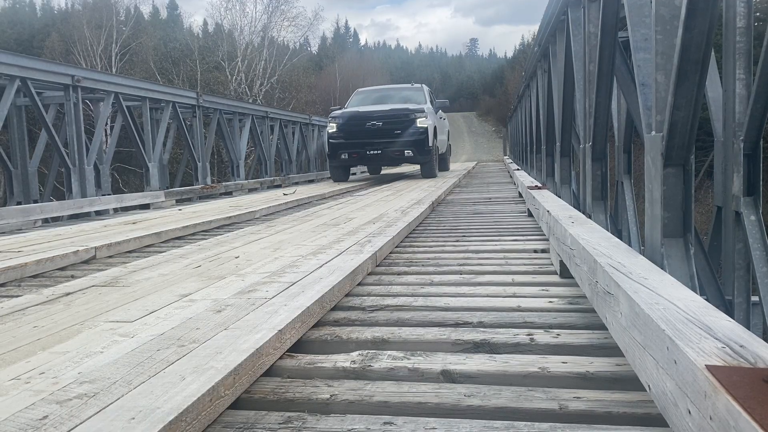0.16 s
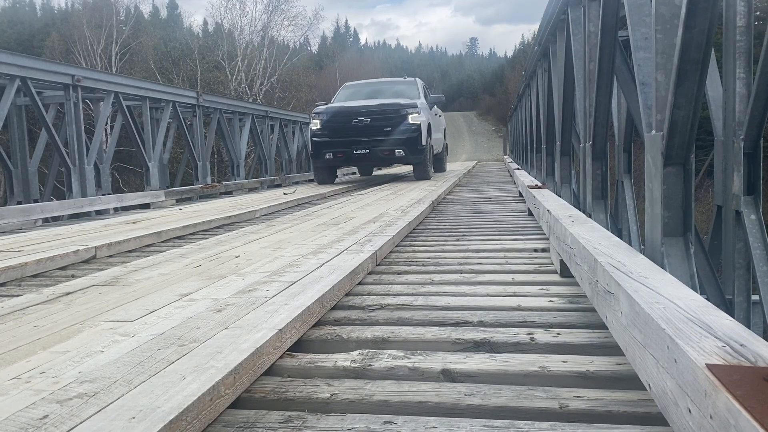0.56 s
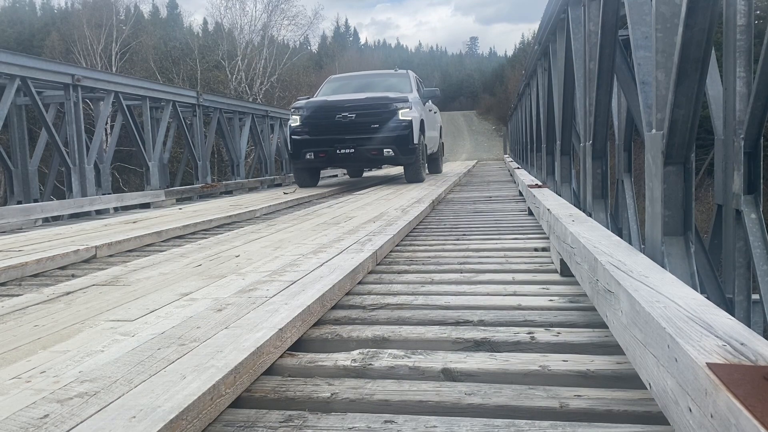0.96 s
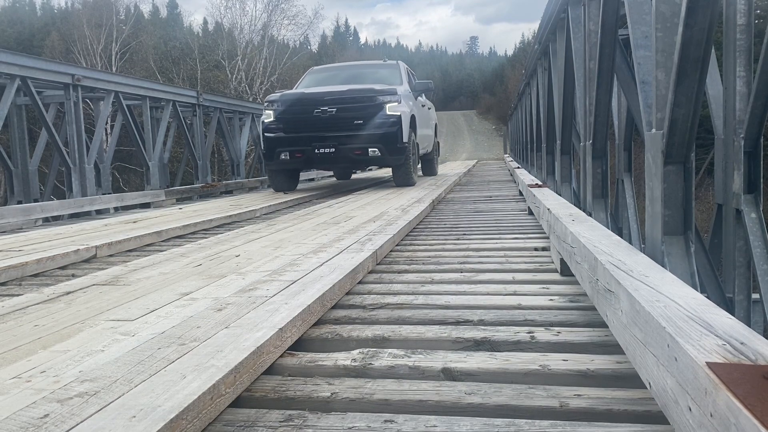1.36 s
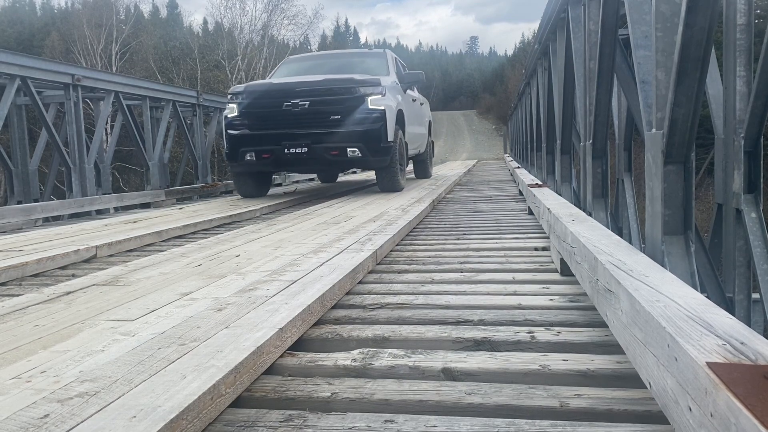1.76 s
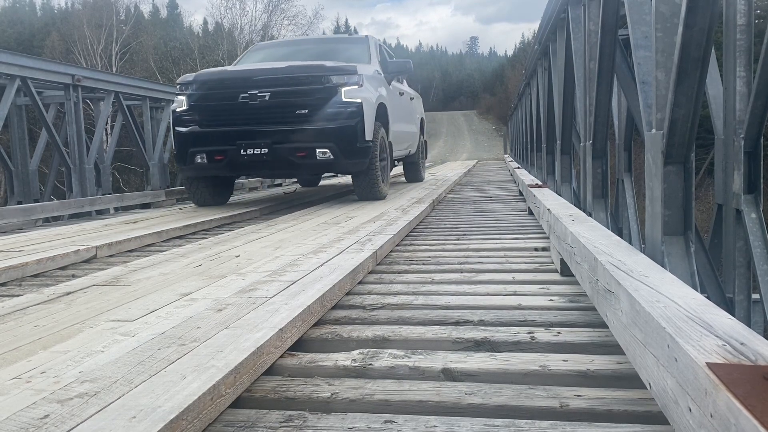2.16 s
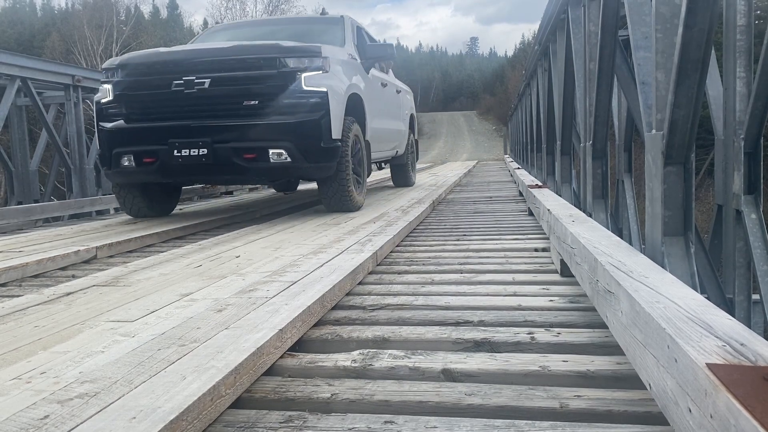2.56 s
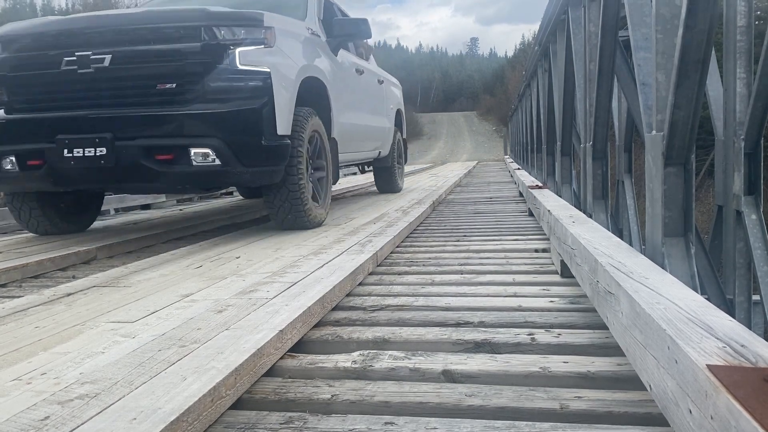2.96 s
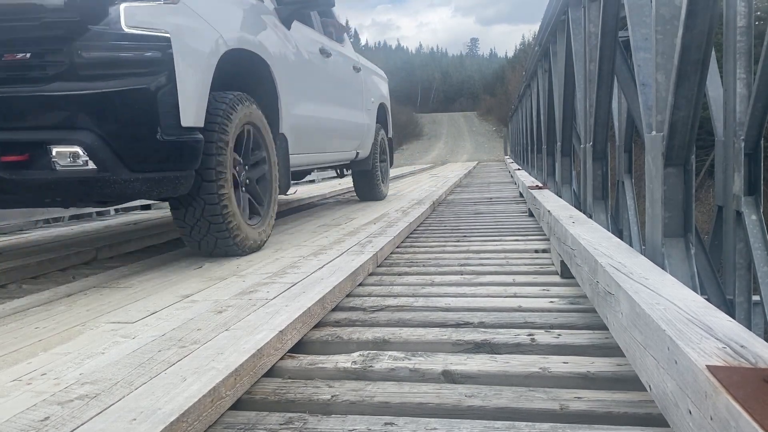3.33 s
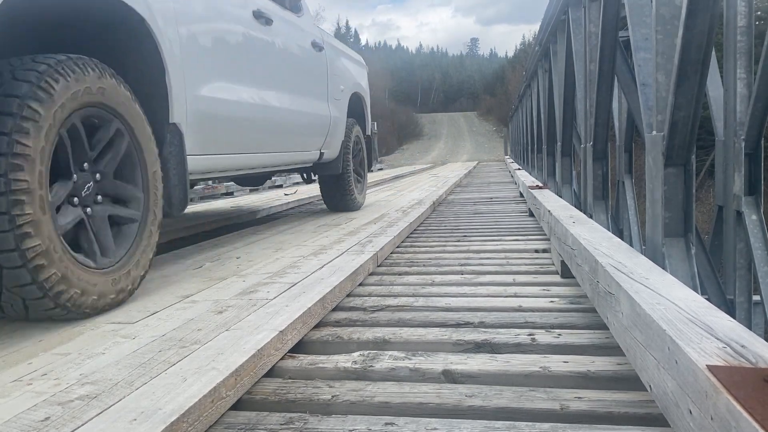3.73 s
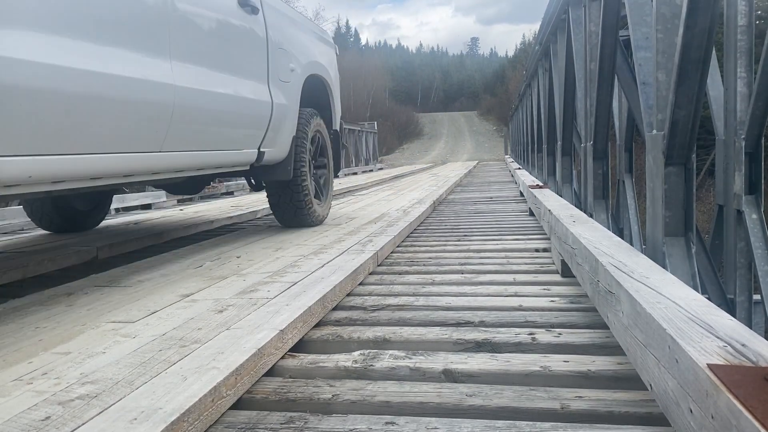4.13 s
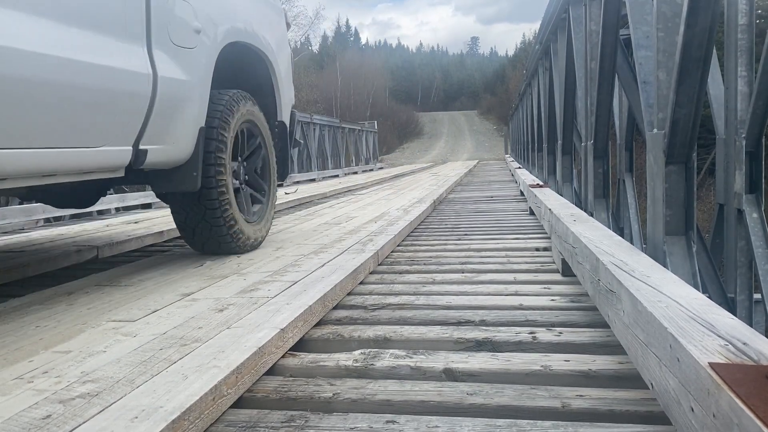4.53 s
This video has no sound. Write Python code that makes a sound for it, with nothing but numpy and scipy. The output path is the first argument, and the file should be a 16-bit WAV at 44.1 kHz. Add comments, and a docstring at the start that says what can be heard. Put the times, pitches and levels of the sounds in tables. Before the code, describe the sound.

A pickup truck rolls slowly up and past over a wooden bridge, loose planks knocking and clattering harder under the tyres above a low rumble.

```python
"""A pickup truck rolls slowly towards and past two close microphone ports, over a bridge's plank deck.
Filtered noise makes the deck's rumble and roar and the treads' whirr and hiss; thin sines whine from the start.
Then loose boards slap down as sprays of contacts that ring modes, and the exhaust hums as a wavering sine.
At about 3 s the slaps grow hard and the image swings left; lower whines follow and the hum returns.
Near the end the tread whirr swells as the rear tyre comes level."""
import sys
import numpy as np
from scipy import signal
from scipy.fft import rfft, irfft, next_fast_len
from scipy.io import wavfile

SR = 44100
rng = np.random.default_rng(int(sys.argv[2]) if len(sys.argv) > 2 else 0)


def field_ratio(decibels):
    """Amplitude ratio for a level in dB (20 dB per decade); scalars and array-likes work."""
    return 10 ** (np.asarray(decibels, dtype=float) / 20)


def transcribe(signal):
    """Save signal, clipped to [-1, 1], as a 16-bit WAV file at the path in sys.argv[1]."""
    frames = np.atleast_2d(signal).T
    limited = np.clip(frames, -1, 1)
    pcm = np.round(limited * 32767).astype(np.int16)
    wavfile.write(sys.argv[1], SR, pcm)


N = 206973

# Low rolling noise. Each row: time in seconds, girder rumble in dB, deck roar in dB before it is stirred.
ROLLING_LEVELS = [(0.0, -49, -42.5), (0.57, -47.5, -47.5), (0.93, -55, -38), (1.19, -52, -44),
                  (1.75, -53, -40), (2.09, -55, -36.5), (2.43, -52, -41.5), (2.7, -52, -35.5),
                  (3.27, -42, -33), (3.76, -43.5, -30), (4.3, -38, -31.5), (4.55, -33, -26.5),
                  (4.69, -31, -28)]
# Rolling noise spectrum, relative within each layer. Each row: frequency in Hz, density in dB per Hz.
ROAD_SPECTRUM = [(25, -75), (60, -2.5), (160, -0.5), (330, -7), (650, -8.5), (1000, -15.5), (1600, -27.5),
                 (2600, -28), (3600, -30.5), (5000, -32), (6500, -36.5), (9000, -36.5), (12300, -41.5),
                 (14300, -43.5), (15700, -49)]
# Firing hum under load, one list per stretch. Each row: time in seconds, pitch in Hz, level in dB.
EXHAUST_HUMS = [
    [(1.12, 77.3, -43.5), (1.22, 76.2, -40), (2.28, 75.54, -32), (2.61, 74.74, -37), (2.93, 74.5, -32),
     (3.14, 74.5, -35.5), (3.33, 78, -58)],
    [(3.86, 77.1, -64), (3.93, 76.9, -39.5), (4.33, 77, -28.5), (4.42, 77.7, -33.5), (4.58, 77, -30),
     (4.69, 79.5, -32.5)],
]
# Drive-train whines. Each row: start in seconds, end in seconds, start pitch in Hz, end pitch in Hz,
# level in dB midway.
DRIVE_WHINES = [(-.3, 0.75, 962, 1000, -58), (.1, .85, 1030, 1064, -62), (1.1, 1.65, 1022, 1040, -59),
                (3.45, 4, 585, 588, -36), (4.05, 4.62, 585, 587, -33), (3.88, 4.4, 699, 694, -37)]
# Board slaps. Each row: start in seconds, thud in dB, knock in dB, crack in dB, board pitch in Hz,
# knock pitch in Hz, clack pitch in Hz, slap length in seconds. Levels are those ahead of scene-wide filters.
BOARD_SLAPS = [(0.722, -51, -45, -60, 199, 530, 1880, 0.0087),
               (0.878, -39.5, -27, -40.5, 337, 1060, 1520, 0.0019),
               (0.902, -33, -34, -55, 343, 580, 2600, 0.0069),
               (1.14, -70, -45.5, -54, 250, 800, 1820, .006),
               (1.552, -34.5, -45.5, -54, 159, 580, 1490, 0.0048),
               (1.579, -36, -42, -57.5, 271, 525, 1910, .0047),
               (1.7598, -32, -36, -55.5, 330, 665, 1620, .0015),
               (1.8795, -26.5, -29, -43, 298, 674, 1640, .0018),
               (2.121, -35, -37.5, -41, 260, 630, 1970, 0.0086),
               (2.174, -36.5, -37.5, -46.5, 185, 610, 2070, 0.018),
               (2.5244, -30.5, -41.5, -43.5, 348, 700, 1810, 0.0033),
               (2.589, -47, -36.5, -43, 237, 660, 2180, .012),
               (2.605, -33, -36, -40.5, 256, 630, 1950, 0.014),
               (2.692, -35, -37.5, -46, 255, 564, 1650, 0.013),
               (2.8581, -24, -27, -36, 242, 968, 1830, 0.0068),
               (3.031, -61, -61, -54, 200, 600, 1930, 0.0044), (3.053, -60, -62, -51, 199, 650, 1900, .004),
               (3.097, -53, -49, -48, 200, 590, 2470, .004),
               (3.118, -13.5, -22.5, -24.5, 326, 700, 2630, .011),
               (3.306, -37, -50, -45, 168, 670, 2280, .0095),
               (3.3803, -18, -25, -34, 327, 475, 2310, .0033),
               (3.4167, -21.5, -23, -33, 302, 600, 1880, 0.011),
               (3.5, -30.5, -37, -46.5, 208, 585, 1910, 0.0082),
               (3.575, -31, -27, -43, 380, 590, 2600, 0.0033),
               (3.5834, -20.5, -26.5, -27.5, 233, 638, 2520, 0.0054),
               (3.604, -22, -31.5, -60, 268, 640, 1800, 0.0035),
               (3.7299, -18.5, -14, -33.5, 260, 790, 2085, 0.0058),
               (3.755, -41, -46, -60, 248, 700, 1590, 0.0042),
               (3.78, -26.5, -25, -54, 235, 600, 1950, 0.0054),
               (3.926, -24, -25, -48, 323, 584, 1970, .011),
               (4.008, -17, -20.5, -41.5, 233, 780, 1830, 0.0075),
               (4.0937, -27, -28.5, -46, 216, 574, 2254, 0.0064),
               (4.245, -32, -33, -60, 213, 577, 2190, 0.0069),
               (4.2862, -37, -28, -47, 230, 615, 2040, .008),
               (4.3997, -36, -26.5, -56, 175, 610, 2120, .0069),
               (4.4344, -20.5, -17, -28.5, 201, 810, 2970, 0.0048),
               (4.473, -32, -33, -44, 191.6, 700, 2360, .0054),
               (4.499, -22.5, -23, -30.5, 243, 740, 2270, 0.0063),
               (4.531, -18.5, -19, -31.5, 197, 680, 2180, 0.0049),
               (4.5733, -27, -29.5, -40.5, 215.4, 595, 3100, 0.0034),
               (4.649, -23, -19, -35.5, 275, 655, 2340, 0.0032),
               (4.676, -29, -40, -46, 209, 580, 2400, .0046)]
# Board modes. Each row: multiple of the board pitch, level in dB, 60 dB decay time in seconds.
BOARD_MODES = [(.55, -6, .05), (0.719, -3.5, 0.056), (0.859, -3.5, 0.06), (1.01, 2.5, 0.065),
               (1.2, -1, 0.055), (1.42, -2.5, 0.052), (1.75, -7, 0.033)]
# Deck modes before the size of a slap shifts them. Each row: frequency in Hz, level in dB,
# 60 dB decay time in seconds.
DECK_MODES = [(449, 3.5, 0.026), (536, 4, 0.026), (610, 2, 0.029), (719, -2, 0.041), (742, 1, 0.022),
              (871, 4.5, 0.016), (992, -1, 0.044), (1103, 4, 0.016), (1233, -13.5, 0.06)]
# Clack modes, shifted likewise. Each row: frequency in Hz, level in dB, 60 dB decay time in seconds.
CLACK_MODES = [(1400, 1, .009), (1600, 1, .008), (1850, 0, .007), (2100, 0, .007), (2400, -1, .006),
               (2750, -2, .005), (3150, -2, .005), (3600, -5, .004), (4100, -7, .003), (4700, -8, .003)]
# Likeness of the two ports. Each row: frequency in Hz, shared share of amplitude from 0 to 1.
PORT_LIKENESS = [(60, .99), (200, .95), (450, .75), (900, .6), (1450, .45), (2100, .7), (4100, .7),
                 (5200, .35), (6000, .5), (6700, .92), (16000, .92)]
# Phase by which the left channel leads, in stepped plateaus above about 8 kHz. Each row: frequency in Hz, #
# lead in radians with the truck ahead, lead in radians with it alongside.
CHANNEL_LEAD = [(0, 0, 0), (200, 0, .15), (600, -.1, .7), (1050, 0, .9), (1500, .8, 3.1), (1950, .2, 6.3),
                (3000, .7, 7.0), (4200, .2, 6.3), (7400, -.2, 6.1), (8000, -.7, 5.6), (8500, -2.9, 3.4),
                (9600, -3.4, 2.9), (10500, -6.2, .1), (11800, -6.3, 0), (12600, -9.2, -2.9),
                (13800, -9.6, -3.3), (14600, -12.5, -6.2), (16500, -12.6, -6.3)]

SPEED_M_PER_S, NEAREST_S, NEAREST_M = 3.53, 4.01, 3.3
ALONGSIDE_S = (3.1, 3.24)  # the image swings from ahead to the side
WHIRR_DB, HISS_DB = -44, -47.5  # at the nearest point, before the rear tyre's swell and the stirring
REAR_TYRE_S, REAR_TYRE_WIDTH_S, REAR_TYRE_DB = 4.43, 0.16, 3  # swell of the tread whirr
TREBLE_HZ, TREBLE_EXTRA_FALL = 7800, 0.54  # share of the distance loss added once more to the top
PAN_DB, AHEAD_PAN_SHARE = 3, 0.35  # left over right alongside; share of it while ahead
WHINE_SWELL_DB = 5  # rise from either end to the middle
FADE_S = 0.03
CLACK_OVER_MEAN_DB = 3  # above the mean of knock and crack
FAVOUR_DB_PER_OCTAVE = 8  # loss of a mode with its distance from the favoured pitch
FIRST_TOUCH_S, FIRST_TOUCH = 0.0014, 9.8  # time and strength of the first blow, before the load weights it


def rms_one(x):
    """Normalisation to unit mean power."""
    return x / np.sqrt(np.mean(x ** 2) + 1e-20)


def in_time(rows):
    """Linear interpolation of each column over the sample times."""
    s, *columns = np.transpose(rows)
    return [np.interp(np.arange(N) / SR, s, c) for c in columns]


def at_hz(points, hz, axis=1):
    """Interpolation of a column on a logarithmic frequency axis."""
    points = np.array(points)
    return np.interp(np.log(hz + 1), np.log(points[:, 0] + 1), points[:, axis])


def high_pass(x, order, hz):
    """Butterworth filter: only the range above the corner passes."""
    return signal.sosfilt(signal.butter(order, hz, "high", fs=SR, output="sos"), x)


def drift(rate):
    """Random modulation of unit rms: noise through two equal poles at a corner of rate Hz."""
    r = np.exp(-80 * np.pi * rate / SR)  # one step is 40 samples
    noise = rng.standard_normal(N // 40 + 2002)
    slow = rms_one(signal.lfilter([1], [1, -2 * r, r * r], noise)[2000:])  # past the filter's onset
    return np.interp(np.arange(N) / 40, np.arange(len(slow)), slow)


def the_pass():
    """Spherical spreading: level falls with distance, faster at the top; pan leans left alongside."""
    t = np.arange(N) / SR
    closeness = NEAREST_M / np.hypot(NEAREST_M, SPEED_M_PER_S * (t - NEAREST_S))
    near_db = 20 * np.log10(closeness)
    rear_db = REAR_TYRE_DB * np.exp(-0.5 * ((t - REAR_TYRE_S) / REAR_TYRE_WIDTH_S) ** 2)
    whirr_db = WHIRR_DB + near_db + rear_db
    hiss_db = HISS_DB + near_db
    pan_db = PAN_DB * np.interp(t, ALONGSIDE_S, [AHEAD_PAN_SHARE, 1])
    return whirr_db, hiss_db, pan_db, TREBLE_EXTRA_FALL * near_db


def rolling(rumble_db, roar_db, whirr_db, hiss_db, patchy_db):
    """Random roughness excitation: third-octave noise bands, stirred by small knocks of boards and grit."""
    layers = np.zeros((4, 2, N))
    edges = 25 * 2 ** np.arange(0, 9.5, 1 / 3)
    white = rng.standard_normal((2, 2, N))
    knocks = (rng.random(N) < 30 / SR) * rng.uniform(0, 0.3, N)  # 30 a second on average
    stir = 1 + signal.lfilter([1], [1, -np.exp(-1 / (0.016 * SR))], knocks)  # each dies over 16 ms
    shared = drift(5.9)
    for k, (low, high) in enumerate(zip(edges, edges[1:])):
        hz = np.sqrt(low * high)
        band_pass = signal.butter(2, [low, high], "band", fs=SR, output="sos")
        band = signal.sosfilt(band_pass, white[k % 2])
        # the treble is steadier
        sway_db = patchy_db * (400 / hz) ** 0.096 * (0.7 * shared + drift(7.7))
        layer = int(hz > 66) + int(hz > 1350) + int(hz > 3300)
        layers[layer] += band * field_ratio(at_hz(ROAD_SPECTRUM, hz) + sway_db)
    rumble, roar, whirr, hiss = map(rms_one, layers)
    treads = field_ratio(whirr_db) * whirr + field_ratio(hiss_db) * hiss
    return field_ratio(rumble_db) * rumble + stir * field_ratio(roar_db) * roar + stir ** 1.1 * treads


def tone(rows, waver, flutter_db):
    """Frequency and amplitude modulation: a near sine wavers in pitch and level, faded at both ends."""
    hz, level_db = in_time(rows)
    t = np.arange(N) / SR
    fade = np.clip(np.minimum(t - rows[0][0], rows[-1][0] - t) / FADE_S + 1, 0, 1)
    phase = 2 * np.pi * np.cumsum(hz * (1 + waver * drift(10.5))) / SR
    return np.sqrt(2) * fade * field_ratio(level_db + flutter_db * drift(30)) * np.sin(phase)


def drive_train():
    """Near-sinusoidal whines: each glides evenly in pitch, swells to its middle and fades."""
    out = 0
    for start_s, end_s, start_hz, end_hz, db in DRIVE_WHINES:
        rows = [(start_s, start_hz, db - WHINE_SWELL_DB),
                (0.5 * (start_s + end_s), 0.5 * (start_hz + end_hz), db),
                (end_s, end_hz, db - WHINE_SWELL_DB)]
        out = out + tone(rows, waver=0.003, flutter_db=2.6)
    return out


def exhaust():
    """Periodic firing: its hum under load is one wavering near sine per stretch."""
    return sum(tone(rows, waver=0.0032, flutter_db=1.0) for rows in EXHAUST_HUMS)


def ring(force, modes, spread_db, pitch=1, favoured_hz=None):
    """Modal superposition: a force rings damped resonators, strongest near a favoured pitch if given."""
    out = 0
    for hz, level_db, t60 in modes:
        r = field_ratio(-60 / (t60 * SR))
        w = 2 * np.pi * hz * pitch / SR
        if favoured_hz:
            level_db = level_db - FAVOUR_DB_PER_OCTAVE * abs(np.log2(hz * pitch / favoured_hz))
        gain = field_ratio(level_db + spread_db * rng.standard_normal())
        mode = signal.lfilter([0, np.sin(w)], [1, -2 * r * np.cos(w), r * r], force)
        out = -out + gain * mode  # neighbours in opposite phase
    return out


def at_level(x, db):
    """Level calibration: sets the rms of the first 20 ms."""
    return field_ratio(db) * x / np.sqrt(np.mean(x[:, :SR // 50] ** 2))


def slap(thud_db, knock_db, crack_db, board_hz, deck_hz, clack_hz, length_s):
    """Impact excitation: a board lands in a spray of contacts, then the deck shudders on."""
    t = np.arange(SR // 3) / SR
    length_s = max(length_s, 0.0006)
    clack_db = 0.5 * (knock_db + crack_db) + CLACK_OVER_MEAN_DB
    strength = field_ratio(2.0 * np.minimum(rng.exponential(1, len(t)), 4))
    contacts = rng.standard_normal((2, len(t))) * strength
    # the edge lands first, as one sharp blow
    contacts[:, round(FIRST_TOUCH_S * SR)] = FIRST_TOUCH * rng.choice([-1, 1], size=2)
    landing = (1 - np.exp(-t / 0.0013)) * np.exp(-t / length_s)
    shudder = (1 - np.exp(-t / 0.0024)) * np.exp(-t / 0.039)
    # the board's load
    weight = (1 - np.exp(-t / 0.0016)) * np.exp(-t / (length_s + 0.00021))
    crack = high_pass(contacts * (landing + field_ratio(-25.0) * shudder), 2, 3300)
    # wood on wood is dull at the very top
    crack = signal.sosfilt(signal.butter(2, 7500, fs=SR, output="sos"), crack)
    size = 1 + 0.037 * rng.standard_normal()  # no two boards are alike
    thud = ring(contacts * (weight + field_ratio(-15.5) * shudder), BOARD_MODES, 2.3, board_hz)
    knock = ring(contacts * (landing + field_ratio(-20.5) * shudder), DECK_MODES, 2.0, size, deck_hz)
    clack = ring(contacts * (landing + field_ratio(-20) * shudder), CLACK_MODES, 1.5, size, clack_hz)
    return (at_level(thud, thud_db) + at_level(knock, knock_db)
            + at_level(clack, clack_db) + at_level(crack, crack_db))


def boards():
    """Radiation efficiency: every slap is summed, and boards are too small to radiate deep bass."""
    out = np.zeros((2, N + SR))
    for start_s, *blow in BOARD_SLAPS:
        sound = slap(*blow)
        at = round(start_s * SR)
        out[:, at:at + sound.shape[1]] += sound
    return high_pass(out[:, :N], 4, 130)


def two_ports(field, pan_db):
    """Partial coherence: the channels share part of the field, with a phase lead and a level difference."""
    size = next_fast_len(N + SR // 4)
    hz = np.arange(size // 2 + 1) * SR / size
    left, other = rfft(field, size)
    alike = np.clip(at_hz(PORT_LIKENESS, hz), 0, 1)
    right = alike * left + np.sqrt(1 - alike ** 2) * other
    ahead, beside = (irfft(right * np.exp(-1j * at_hz(CHANNEL_LEAD, hz, axis=k)), size)[:N] for k in (1, 2))
    passing = np.interp(np.arange(N) / SR, ALONGSIDE_S, [0, 1])
    ports = np.array([field[0], (1 - passing) * ahead + passing * beside])
    # the housing shades the middle range
    middle = signal.butter(2, [250, 5000], "band", fs=SR, output="sos")
    shadowed = signal.sosfiltfilt(middle, ports)
    return ports + shadowed * (field_ratio(pan_db * np.array([[0.5], [-0.5]])) - 1)


def scene():
    """Superposition: two unrelated versions of the sound field add up, and the ports mix them."""
    rumble_db, roar_db = in_time(ROLLING_LEVELS)
    whirr_db, hiss_db, pan_db, treble_db = the_pass()
    field = rolling(rumble_db, roar_db, whirr_db, hiss_db, patchy_db=1.4) + boards()
    top = signal.butter(2, TREBLE_HZ, "high", fs=SR, output="sos")
    treble = signal.sosfiltfilt(top, field)
    field += treble * (field_ratio(treble_db) - 1)
    field[0] += drive_train() + exhaust()
    return two_ports(field, pan_db)


def low_pass(x):
    """Removes everything above the highest recorded frequency."""
    return signal.sosfilt(signal.butter(12, 16640, fs=SR, output="sos"), x)


def record(dry):
    """Band limitation: a steep low-pass filter cuts the top above about 16 kHz."""
    mix = signal.sosfilt(signal.cheby2(10, 40, 16100, fs=SR, output="sos"), dry)
    return low_pass(mix)


dry = scene()
out = record(dry)
transcribe(out)
```